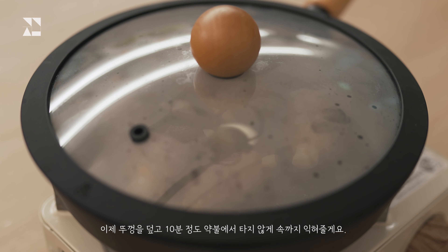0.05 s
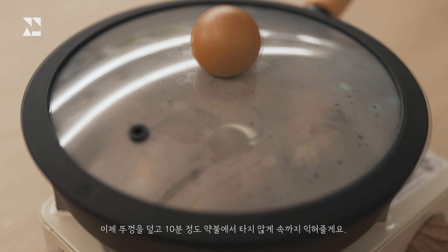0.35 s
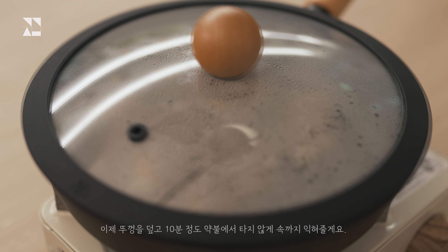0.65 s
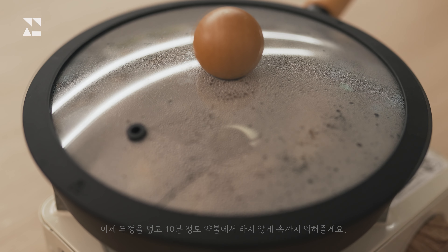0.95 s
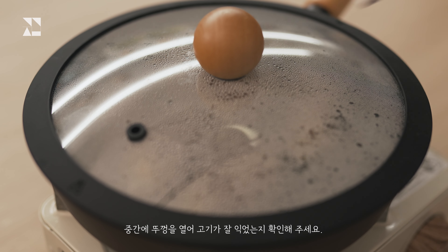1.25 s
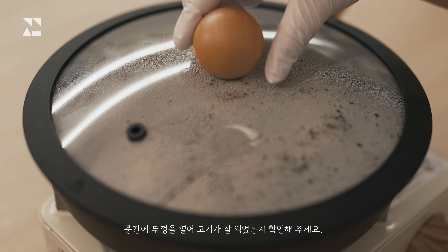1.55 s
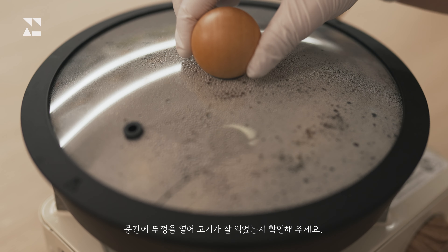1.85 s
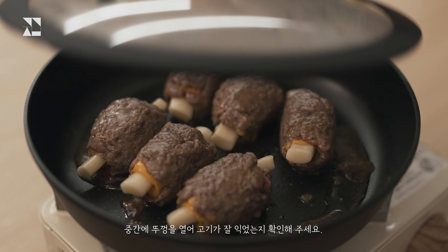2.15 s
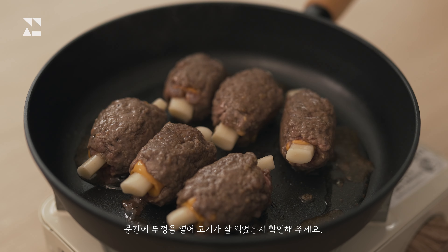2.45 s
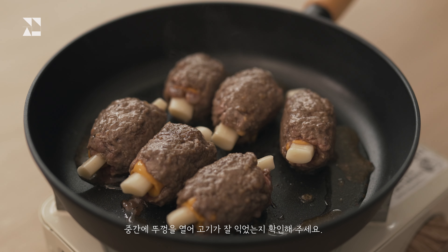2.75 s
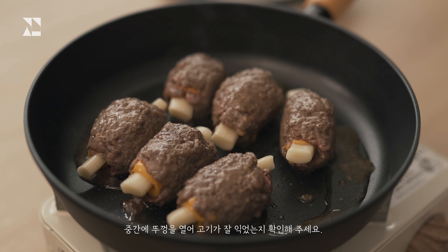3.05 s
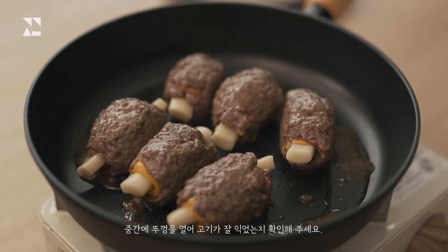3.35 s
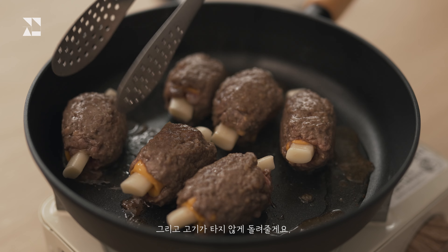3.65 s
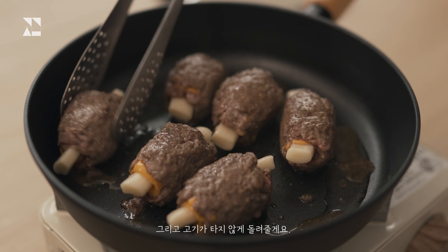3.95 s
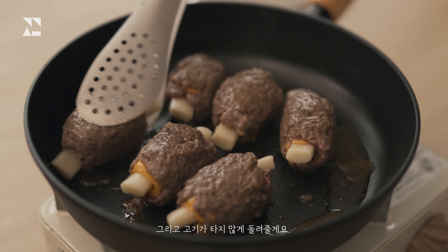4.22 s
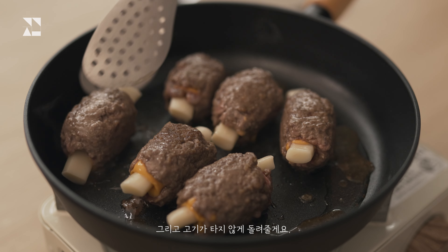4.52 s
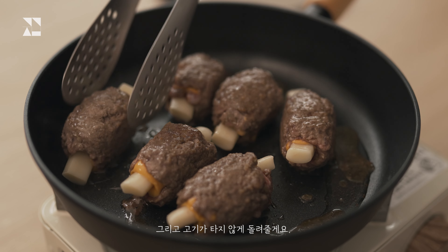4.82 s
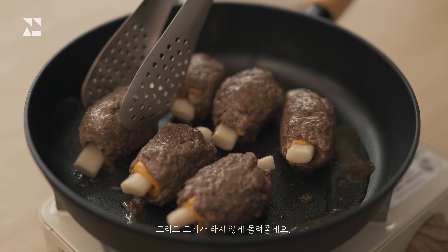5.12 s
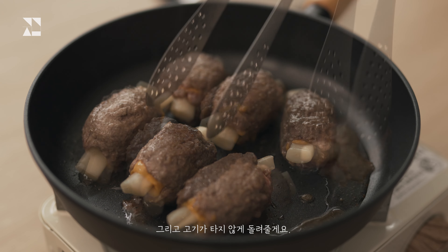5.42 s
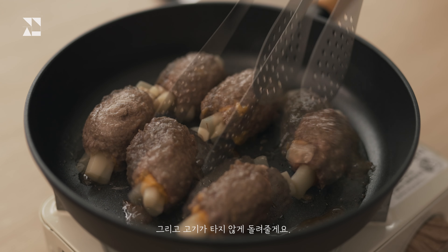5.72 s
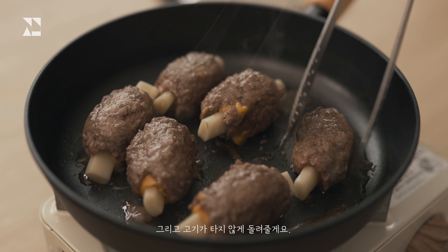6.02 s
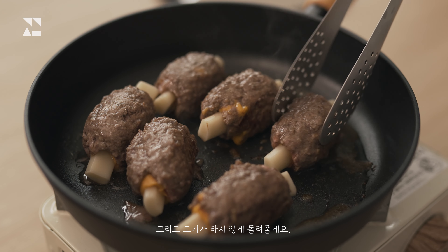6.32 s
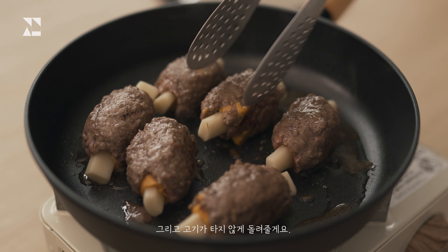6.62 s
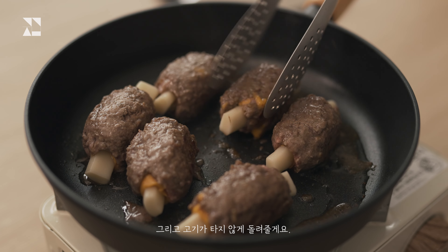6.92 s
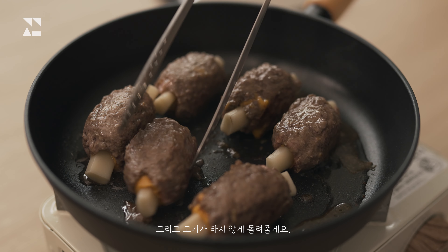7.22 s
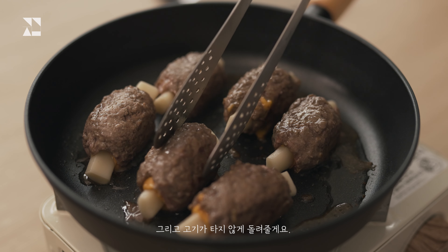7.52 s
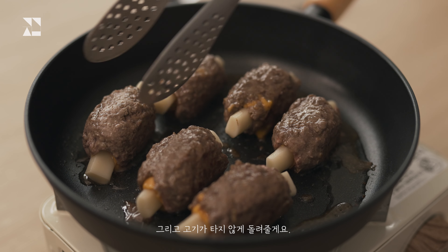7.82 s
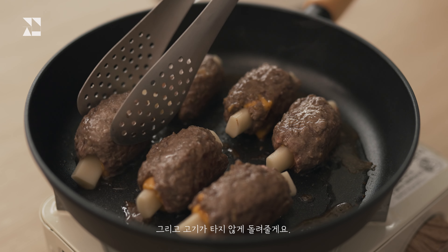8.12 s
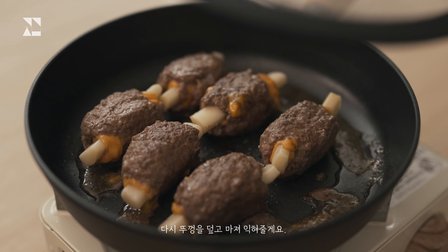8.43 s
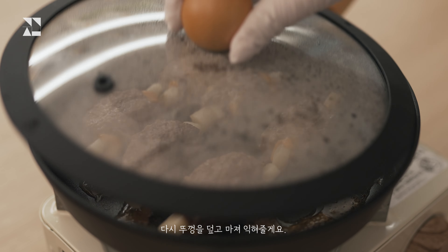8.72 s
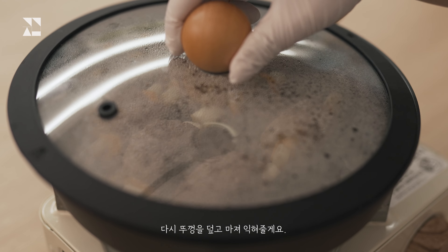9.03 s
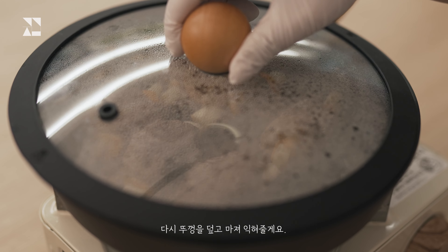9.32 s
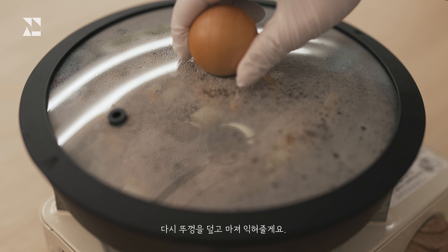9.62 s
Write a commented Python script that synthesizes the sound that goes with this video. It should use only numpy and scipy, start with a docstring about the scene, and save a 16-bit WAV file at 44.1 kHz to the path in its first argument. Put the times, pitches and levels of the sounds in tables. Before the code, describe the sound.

Meat patties fry in oil in a covered pan in a kitchen, heard from close by. A dense, bright sizzle runs the whole time, dotted with sharp little spits and ticks of fat, some knocking lightly against the pan. Underneath, juice simmers dully and small bubbles sound faintly hollow beneath the lid. The frying swells and dips a little and gradually becomes softer.

```python
"""A dense sizzle of patties frying in oil in a lidded pan: water flashes to steam in countless tiny bursts.
Sharper spits of fat crack out and knock the pan's modes into ringing. Beneath them juice simmers dully,
and small bubbles sound the air under the lid. The same 2.1 seconds of frying come round again and again,
a little softer each time."""
import sys
import numpy as np
from scipy import signal
from scipy.fft import rfft, irfft, next_fast_len
from scipy.io import wavfile
from scipy.ndimage import map_coordinates

SR = 44100
rng = np.random.default_rng(int(sys.argv[2]) if len(sys.argv) > 2 else 0)


def file_out(sig):
    """Save sig as 16-bit WAV at sys.argv[1]."""
    # one column per channel
    cols = np.atleast_2d(sig).T
    # limit, then scale
    lim = np.clip(cols, -1, 1)
    pcm = np.round(lim * 32767).astype(np.int16)
    wavfile.write(sys.argv[1], SR, pcm)


N = 426447

START_S, ROUND_S = 2.1021, 2.102109  # table times lie in the round that begins at START_S
ROUND = round(ROUND_S * SR)  # samples
TOP_HZ = 15750

# spectrum of the sizzle as it leaves the pan: (frequency [Hz], level [dB])
SIZZLE_SPECTRUM = [(1500, -51.5), (1950, -29.5), (2200, -9), (2450, -11), (2660, -8.5), (2980, -6),
                   (3400, -2.5), (4100, -1), (4700, -1), (5500, 1.5), (6100, 0), (7100, -5), (9000, -17),
                   (16000, -31)]
# spectrum of sputter heard through the air under the lid: (frequency [Hz], level [dB])
CAVITY_SPECTRUM = [(150, -36.5), (360, -22), (450, -5.5), (540, -0.5), (640, -0.5), (800, -5), (1050, -2.5),
                   (1370, -0.5), (1600, -2), (1950, -2), (2600, 1), (5000, -40.5)]
# vigour of the frying, surging as juice meets the oil, easing as it boils off: (time [s], level [dB])
VIGOUR = [(2.1, -45.9), (2.19, -47), (2.26, -48.5), (2.35, -46.7), (2.55, -46), (2.63, -45.9),
          (2.69, -47.5), (2.76, -46.2), (2.87, -46.3), (3.03, -48.7), (3.17, -48.6), (3.3, -49.7),
          (3.4, -49.4), (3.53, -48.8), (3.63, -46.9), (3.82, -47.2), (4.02, -50), (4.1, -48.1),
          (4.2, -46.2)]
# envelope of the sputter under the lid: (time [s], level [dB])
SPUTTER_LEVEL = [(2.1, -61), (2.38, -61), (2.7, -63), (2.97, -61), (3.02, -65), (3.35, -64), (3.5, -64),
                 (3.85, -63), (4.2, -63.5)]


def sizzle():
    """Superposition: countless steam bursts merge into a hiss, from which ticks and bubbles stand out."""
    # spectrum of the finest bursts: (frequency [Hz], level [dB])
    fizz_spectrum = [(4000, -45), (6300, -11), (7400, -3.5), (8400, 1.5), (9200, -2), (10000, -1.5),
                     (11000, -6.5), (12000, -12), (13500, -19), (15800, -24)]
    # their envelope: (time [s], level [dB])
    fizz_level = [(2.1, -49), (2.16, -51), (2.25, -51.3), (2.4, -49.8), (2.68, -50.5), (2.81, -49),
                  (3.03, -51.8), (3.12, -50.5), (3.3, -52.6), (3.41, -53.2), (3.56, -50.3), (3.68, -50.3),
                  (3.8, -51.5), (4.03, -52.3), (4.13, -51.7), (4.2, -50)]
    clustering = amp(.2 * wobble(16) + .3 * wobble(50) + .5 * wobble(190))
    ticks = bursts(per_s=800, spread_db=3.5)
    froth = bubbles(count=1500, pitch_hz=5430, scatter=.38, cycles=2.8, spread_db=5.5)
    hiss = rng.standard_normal((3, ROUND))
    steam = hiss[0] + amp(-12) * ticks + amp(-8) * froth
    body = amp(envelope(VIGOUR) - 1.76) * colour(steam, SIZZLE_SPECTRUM)
    fizz = amp(envelope(fizz_level)) * colour(hiss[1] + amp(-3) * ticks, fizz_spectrum)
    sputter = amp(envelope(SPUTTER_LEVEL) - .63) * colour(hiss[2] + amp(-9) * ticks, CAVITY_SPECTRUM)
    return clustering * (body + fizz + sputter)


def spits():
    """Impulse excitation: a bubble cracks open, rings, knocks the pan's modes and sprays droplets."""
    # spits of fat: (time [s], level [dB], pitch [Hz], life [cycles], knock level [dB re spit],
    # knock tilt [dB/octave])
    fat_spits = [(2.1216, -29, 5900, 7, -31, -1), (2.1685, -27.7, 5700, 11, -22, -2),
                 (2.2013, -28.5, 6000, 6, -22.5, -1), (2.3373, -28.5, 7000, 3, -26, 2),
                 (2.3906, -30.5, 6100, 11, -22, -2), (2.4236, -31, 5500, 4, -23, 4),
                 (2.4444, -29, 6300, 4, -25, 4), (2.5142, -29, 5000, 4, -26, 2),
                 (2.5325, -29.5, 5430, 5, -29, 0), (2.6377, -29, 6000, 7, -33, -1),
                 (2.7365, -31.5, 5340, 5, -27, 0), (2.8040, -30, 8000, 5, -28, 0),
                 (2.8275, -29.5, 5450, 4, -24, 4), (2.9236, -31.5, 5830, 4, -22, -2),
                 (3.1015, -37, 4000, 7, -30, 0), (3.1618, -35.5, 5450, 5, -25, 0),
                 (3.4071, -29, 5350, 7, -17, 1.5), (3.6088, -33, 5250, 6, -29, 1),
                 (3.8320, -32.5, 5100, 5, -32, 0), (4.0815, -32, 5400, 7, -26, 0)]
    # modes of the covered pan: (frequency [Hz], level [dB], T60 [s])
    pan_modes = [(560, -11, 0.014), (695, -13, 0.04), (950, -4, 0.005), (1160, -11, 0.02),
                 (1400, -5, 0.004), (1840, -5, 0.005), (2330, -2, 0.012), (2600, 2, 0.028)]
    # spectrum of a spit's dry crack: (frequency [Hz], level [dB])
    crack_spectrum = [(1200, -20), (2600, -2), (6500, 0), (10500, -5), (15800, -20)]
    out, t = np.zeros(ROUND + SR), np.arange(SR // 8) / SR
    trapped, droplets, snap = noise(CAVITY_SPECTRUM), noise(SIZZLE_SPECTRUM), noise(crack_spectrum)
    pivot_hz = 1390  # the knock's spectrum tilts about this frequency
    for s, db, hz, cycles, knock_db, tilt in fat_spits:
        at = round((s - START_S) * SR)
        turns = hz * t
        age = np.minimum(2 * turns / cycles, 10)
        falling_hz = hz * np.exp(.2 * (.7 - age))  # the pitch sinks as the crater opens
        onset = 1 - np.exp(-(2 * turns) ** 2)
        ring = onset * np.exp(-age ** 2) * np.sin(2 * np.pi * np.cumsum(falling_hz) / SR)
        crack = decay(t, db=-12, t60=.005) * np.roll(snap, -at)[:len(t)]
        knock = sum(decay(t, mode_db + tilt * np.log2(f / pivot_hz) + rng.normal(0, .42), t60)
                    * np.sin(2 * np.pi * f * t) for f, mode_db, t60 in pan_modes)
        lid_echo = decay(t, db=-8.5, t60=.13) * np.roll(trapped, -at)[:len(t)]
        spray = decay(t, db=-24, t60=.06) * np.roll(droplets, -at)[:len(t)]
        out[at:][:len(t)] += amp(db) * (ring + crack + amp(knock_db) * (knock + lid_echo) + spray)
    # so small a source radiates no bass
    return signal.sosfilt(signal.butter(4, 500, "highpass", fs=SR, output="sos"), out[:ROUND])


def pan_ring():
    """Forced resonance: the patter of bursts keeps the covered pan's strongest mode ringing."""
    # resonance curve of that mode: (frequency [Hz], level [dB])
    resonance = [(1900, -39.5), (2350, -11.5), (2560, -2), (2670, 0), (2800, -4), (3000, -15),
                 (3700, -39.5)]
    # its envelope: (time [s], level [dB])
    ring_level = [(2.1, -60.5), (2.27, -63), (2.33, -58.5), (2.47, -57), (2.7, -59.5), (2.98, -56.5),
                  (3.1, -62), (3.2, -61.5), (3.27, -71), (3.5, -61.5), (3.56, -61), (3.9, -64), (4.03, -58),
                  (4.2, -65.5)]
    patter = rng.standard_normal(ROUND) + bursts(per_s=300, spread_db=0)
    return amp(envelope(ring_level)) * colour(patter, resonance)


def pockets():
    """Size sets a bubble's pitch: a pocket of juice boils off in like-sized bubbles, a pitched swell."""
    # pockets of juice: (centre time [s], duration [s], level [dB], pitch [Hz])
    boil_offs = [(2.429, 0.05, -62.5, 2280), (2.77, 0.18, -59.5, 3380), (4.129, 0.1, -53, 4050)]
    t = START_S + np.arange(ROUND) / SR
    out = np.zeros(ROUND)
    for s, duration, db, hz in boil_offs:
        swell = amp(db) * np.exp(-(2 * (t - s) / duration) ** 2)
        out += swell * bubbles(count=1500, pitch_hz=hz, scatter=.12, cycles=16, spread_db=1, samples=256)
    return out


def crackle():
    """Damped oscillation: small spits tick, the tiniest highest, and louder as the frying quickens."""
    small = bubbles(count=90, pitch_hz=5400, scatter=.22, cycles=8, spread_db=2)
    tiny = bubbles(count=50, pitch_hz=10000, scatter=.13, cycles=6, spread_db=2)
    return vigour_gain(mean_db=-65, db_per_db=1.5) * (small + amp(-4) * tiny)


def glugs():
    """Cavity resonance: a bubble opens softly and the air under the lid rings, wavering as juice moves."""
    # bubbles that sound the cavity: (time [s], level [dB], pitch [Hz])
    openings = [(2.168, -58, 648), (2.201, -58, 654), (2.25, -65, 620), (2.334, -66, 513),
                (2.608, -53, 550), (2.681, -61.5, 557), (2.944, -62, 600), (3.005, -58.5, 568),
                (3.42, -60.5, 527), (3.577, -60.5, 557), (3.792, -60, 547), (3.831, -63, 532),
                (3.887, -58, 625), (3.971, -58, 680)]
    out, t = np.zeros(ROUND + SR), np.arange(SR // 5) / SR
    attack_s, waver = .005, .07
    onset = 1 - np.exp(-t / attack_s)
    for s, db, hz in openings:
        wavering_hz = hz * (1 + waver * wobble(110)[:len(t)])
        ring = np.sin(2 * np.pi * np.cumsum(wavering_hz) / SR)
        out[round((s - START_S) * SR):][:len(t)] += onset * decay(t, db, t60=.12) * ring
    return out[:ROUND]


def blips():
    """Free decay: middle-sized bubbles ring briefly in the hollow under the lid."""
    low = bubbles(count=90, pitch_hz=600, scatter=.13, cycles=35, spread_db=1, samples=4096)
    high = bubbles(count=70, pitch_hz=1350, scatter=.2, cycles=40, spread_db=2.5, samples=4096)
    return amp(envelope(SPUTTER_LEVEL)) * (amp(-20) * low + amp(-12) * high)


def burbles():
    """Bubble resonance: a steam bubble swells in the juice, its pitch rising as it nears the surface."""
    # larger bubbles in the juice: (time [s], level [dB], starting pitch [Hz])
    steam_bubbles = [(2.19, -62, 208), (2.297, -63, 211), (2.372, -65, 203), (2.424, -67, 184),
                     (2.506, -62, 205), (2.515, -63, 123), (2.56, -62.5, 135), (2.767, -65, 147),
                     (2.794, -65, 197), (2.839, -65.5, 221), (2.887, -63.5, 197), (2.926, -63, 178),
                     (3.22, -61.5, 162), (3.758, -65, 136), (3.826, -66, 205), (4.125, -60, 173)]
    out, t = np.zeros(ROUND + SR), np.arange(SR // 6) / SR
    swell_s, rise_per_s = .02, .7
    swell = (t / swell_s * np.exp(1 - t / swell_s)) ** 2
    for s, db, hz in steam_bubbles:
        phase = 2 * np.pi * hz * (t + rise_per_s * t * t / 2) + rng.uniform(0, 2 * np.pi)
        out[round((s - START_S) * SR):][:len(t)] += amp(db - 3) * swell * np.sin(phase)
    return out[:ROUND]


def simmer():
    """Random excitation: juice bubbles dully under the lid, over a faint, slightly wide rumble."""
    # spectrum of the simmering juice: (frequency [Hz], level [dB])
    juice_spectrum = [(50, -50), (85, -14), (125, -4.5), (165, -1), (208, -2.5), (255, -2.5), (310, -11.5),
                      (450, -12), (900, -40)]
    # spectrum of the rumble: (frequency [Hz], level [dB])
    rumble_spectrum = [(8, -6), (22, 7.5), (38, -5.5), (58, -23), (100, -26), (300, -48)]
    # its envelope: (time [s], level [dB])
    rumble_level = [(2.1, -89), (2.39, -105), (2.58, -78), (2.68, -95), (2.8, -87), (3.26, -79), (3.4, -95),
                    (4.2, -102)]
    bubbling = rng.standard_normal(ROUND) + bursts(per_s=54, spread_db=-1.5)
    juice = vigour_gain(mean_db=-72.5, db_per_db=.43) * colour(bubbling, juice_spectrum)
    rumble = amp(envelope(rumble_level)) * noise(rumble_spectrum)
    side = amp(-95) * noise(rumble_spectrum) + amp(-93) * noise(juice_spectrum)
    return juice + rumble + np.array([side, -side])


def bursts(per_s, spread_db):
    """A Poisson process: impulses at random moments, many small and a few large, at rms 1."""
    happens = rng.random(ROUND) < per_s / SR
    strength = amp(spread_db * np.clip(rng.standard_normal(ROUND), -2, 2))
    return unit(happens * strength * rng.choice([-1, 1], ROUND))


def bubbles(count, pitch_hz, scatter, cycles, spread_db, samples=96):
    """Damped oscillators of random onset, pitch and strength, each falling 60 dB in `cycles` periods."""
    onsets = (rng.random(count) * ROUND).astype(int)
    detune, strength = np.clip(rng.standard_normal((2, count)), -2, 2)
    hz = np.minimum(pitch_hz * np.exp(scatter * detune), TOP_HZ)
    n = np.arange(samples)
    turns = hz[:, None] * n / SR
    rings = amp(spread_db * strength[:, None] - 60 * turns / cycles) * np.sin(2 * np.pi * turns)
    positions = (onsets[:, None] + n) % ROUND
    return unit(np.bincount(positions.ravel(), rings.ravel(), ROUND))


def colour(x, spectrum):
    """Minimum-phase filtering of one round to the given spectrum, at rms 1."""
    hz, db = np.transpose(spectrum)
    bin_hz = np.fft.rfftfreq(ROUND, 1 / SR)
    gain = amp(np.interp(np.log(bin_hz + 1), np.log(hz), db))
    cepstrum = irfft(np.log(gain), ROUND)
    cepstrum[1:ROUND // 2] *= 2  # folding onto positive time makes the filter causal
    cepstrum[ROUND // 2 + 1:] = 0
    return unit(irfft(rfft(x) * np.exp(rfft(cepstrum)), ROUND))


def noise(spectrum):
    """One round of Gaussian noise with the given spectrum."""
    return colour(rng.standard_normal(ROUND), spectrum)


def vigour_gain(mean_db, db_per_db):
    """Amplitude modulation: a gain that rises and falls with the vigour of the frying."""
    vigour_db = envelope(VIGOUR)
    return amp(mean_db + db_per_db * (vigour_db - vigour_db.mean()))


def envelope(points):
    """Level in dB at each sample of the round, by linear interpolation."""
    s, db = np.transpose(points)
    return np.interp(START_S + np.arange(ROUND) / SR, s, db)


def wobble(knots_per_s):
    """Smooth random modulation over one round."""
    return map_coordinates(rng.standard_normal(1024), [np.arange(ROUND) * knots_per_s / SR], mode="wrap")


def decay(t, db, t60):
    """Exponential decay from db, falling 60 dB in t60 seconds."""
    return amp(db - 60 * t / t60)


def amp(db):
    """Decibels to amplitude ratio."""
    return 10 ** (np.asarray(db) / 20)


def unit(x):
    """Normalisation to rms 1."""
    return x / np.sqrt(np.mean(x ** 2) + 1e-20)


def scene():
    """Periodic repetition: the sources add into one round, which recurs while the level slowly sinks."""
    reflection_s, fade_db_per_s = .0051, .2175
    spit = spits()
    reflection = amp(-15) * np.roll(spit, round(reflection_s * SR))  # off a nearby surface
    frying = sizzle() + spit + reflection + pan_ring() + pockets() + crackle()
    under_lid = simmer() + burbles() + glugs() + blips()
    n = np.arange(N) - round(START_S * SR)
    return (frying + under_lid)[:, n % ROUND] * amp(1.11 - fade_db_per_s * n / SR)


def record(dry):
    """Band limiting: an ideal low-pass filter passes nothing above TOP_HZ."""
    size = next_fast_len(N + SR // 2)
    passband = np.fft.rfftfreq(size, 1 / SR) < TOP_HZ
    return irfft(rfft(dry, size) * passband, size)[:, :N]


dry = scene()
out = record(dry)
file_out(out)
```